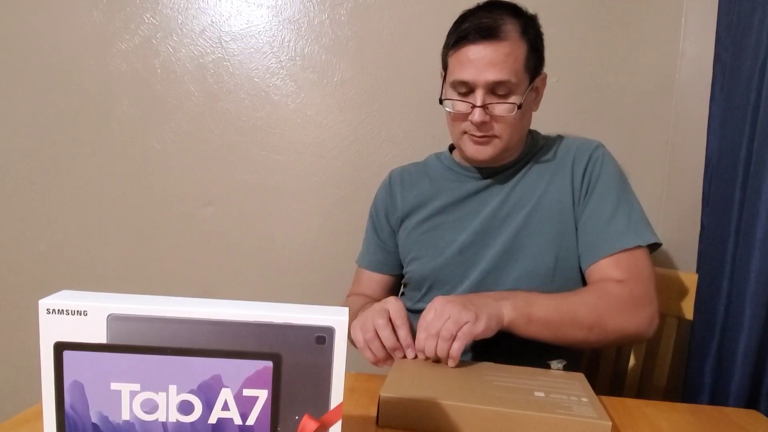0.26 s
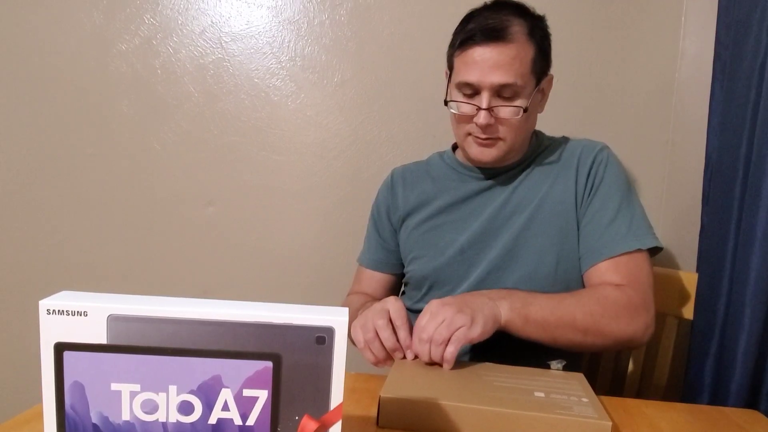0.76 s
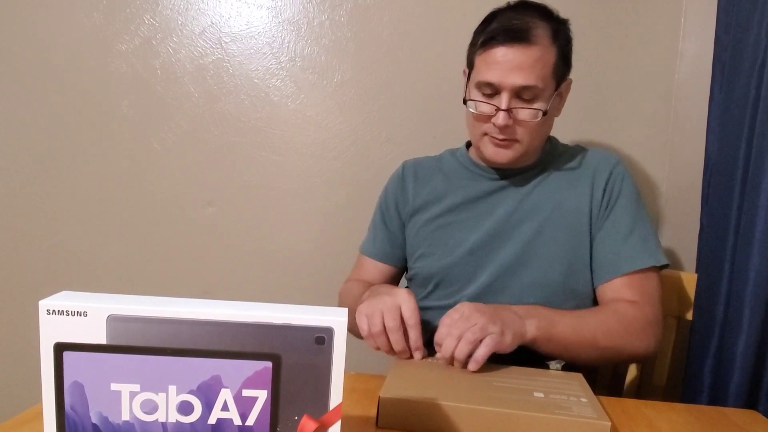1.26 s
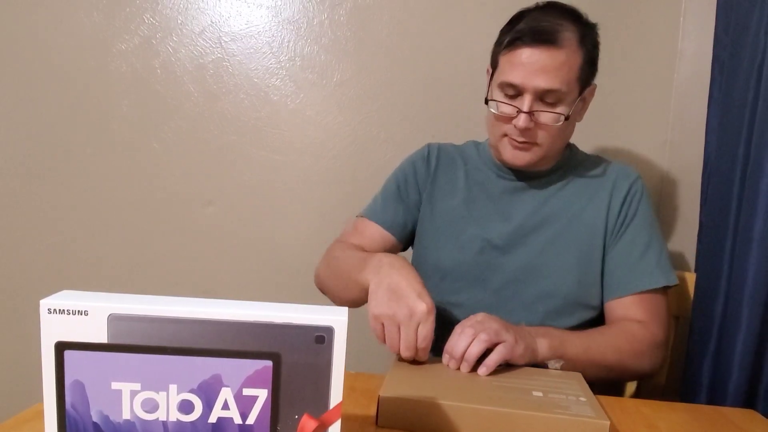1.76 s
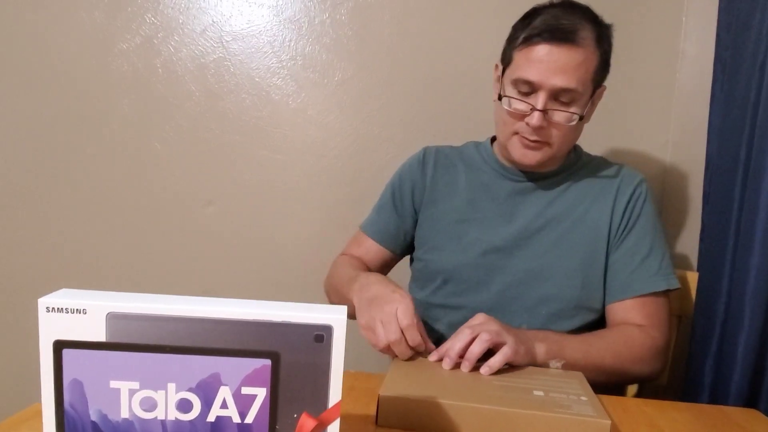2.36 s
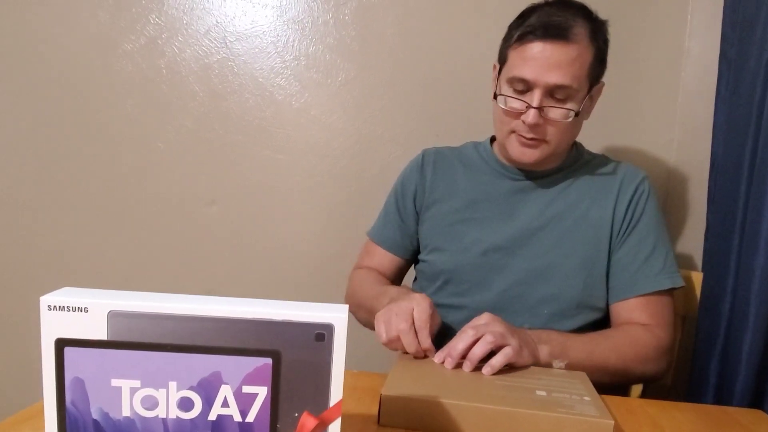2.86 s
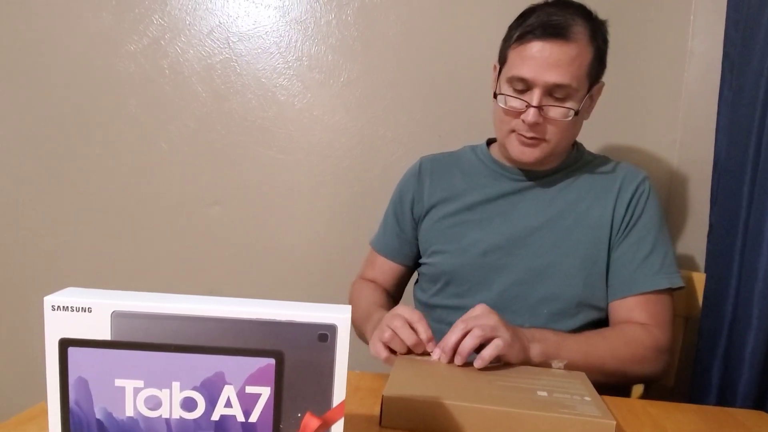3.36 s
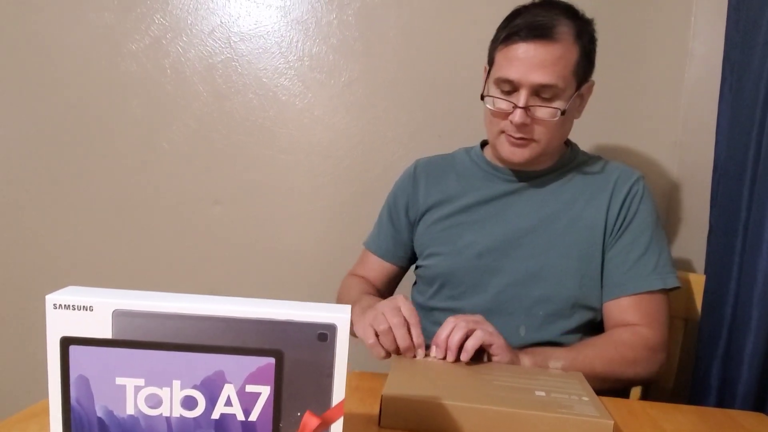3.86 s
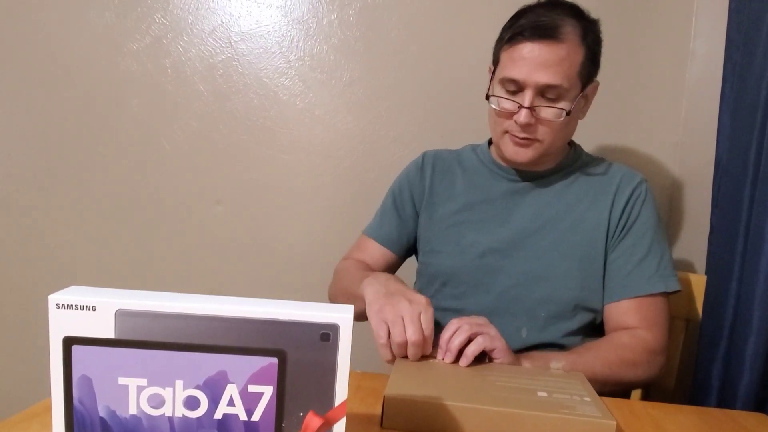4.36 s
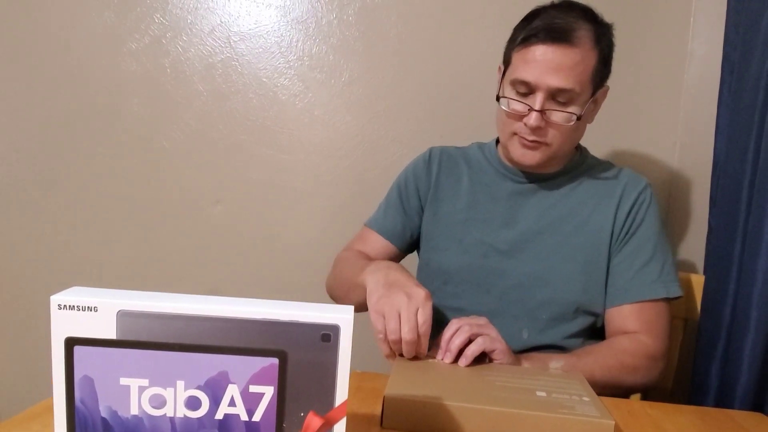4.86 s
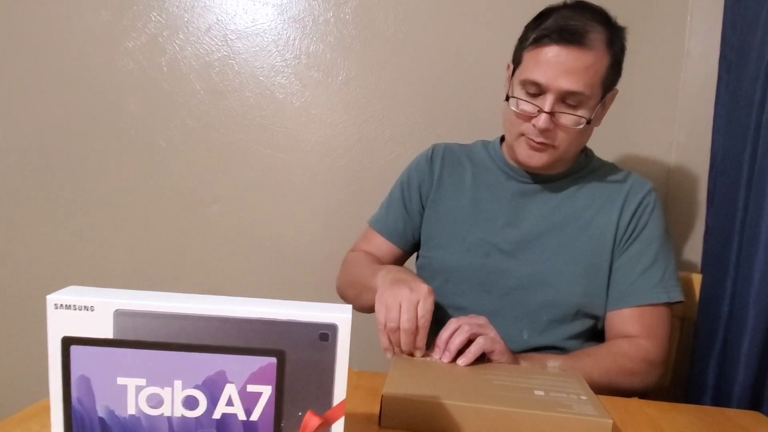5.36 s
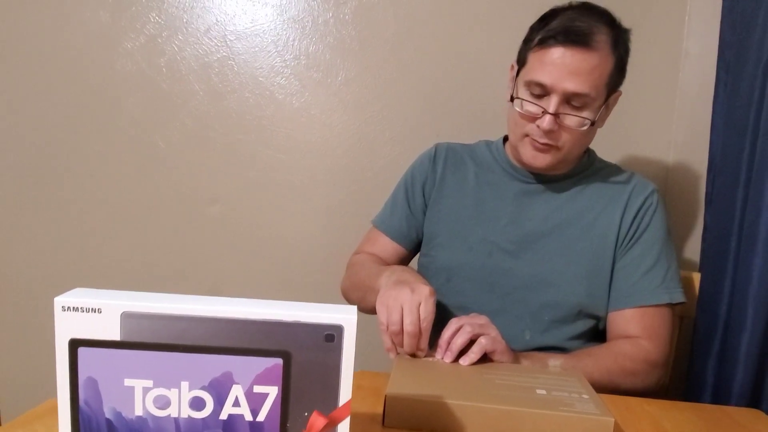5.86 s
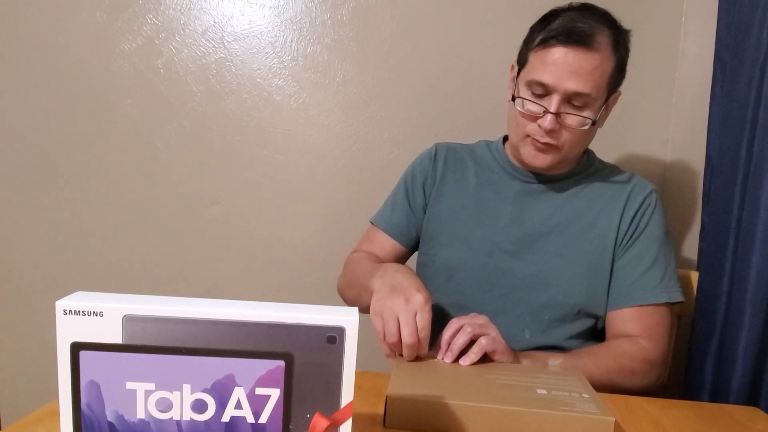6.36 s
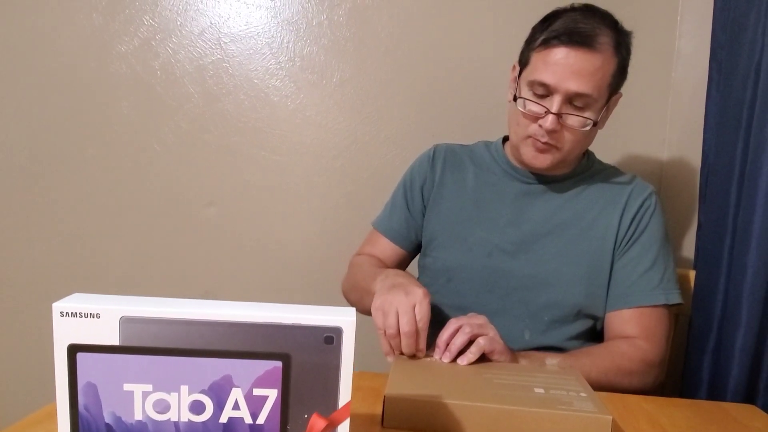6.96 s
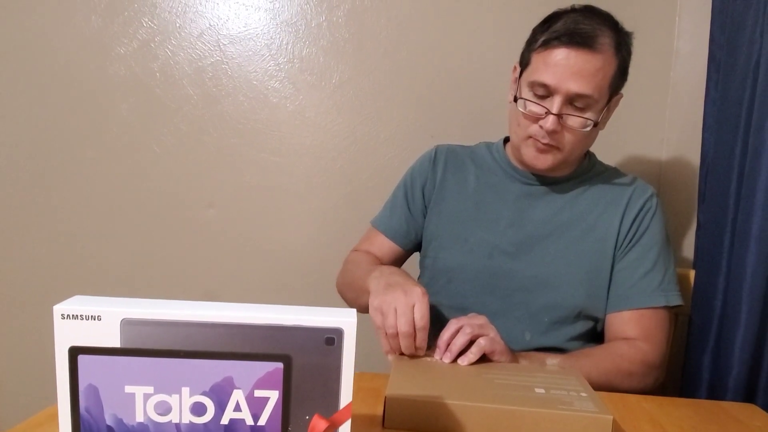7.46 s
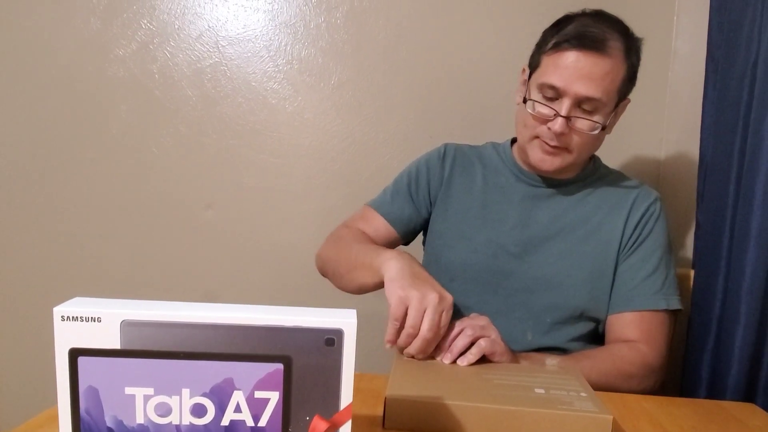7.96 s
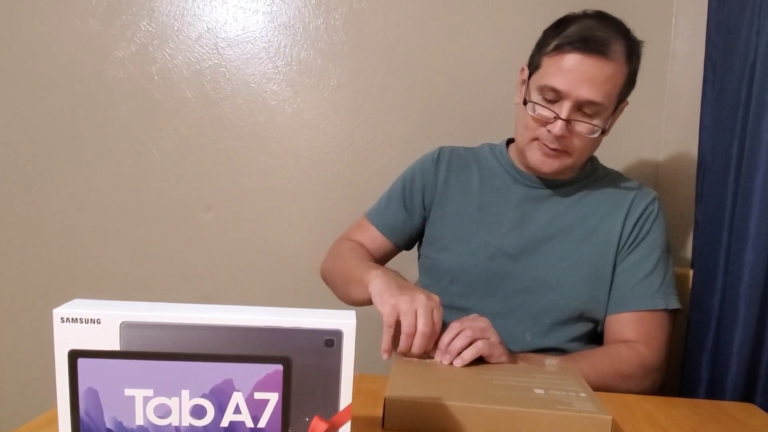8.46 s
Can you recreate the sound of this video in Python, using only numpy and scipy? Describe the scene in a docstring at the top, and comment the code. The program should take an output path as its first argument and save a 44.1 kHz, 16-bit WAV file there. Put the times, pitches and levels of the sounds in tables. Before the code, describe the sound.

A small quiet room with faint air and a low wavering hum, a microphone about a metre from a cardboard box on a table. A soft bump and skin rustle open, then quick nail knocks and scratches at 0.2-0.4 s. At 0.95 the box drops with a hollow thump and a sharp snap. Rubbing and light taps follow, with fine sizzling near 2.0 and a brief papery rip at 2.5. Tape peels in a jerky crackle from 2.8 to 3.2, with bright clicks until 3.7. Another thump comes at 4.3, a strong snap at 4.55 and nail scrapes until 5.2. Faint fidgeting taps grow from 5.7, a duller bump lands at 6.3, and scrapes follow around 6.6. Sparse touches and rustles lead to a second crackling pull from 8.1, ending near 8.47 in the loudest tight burst of snaps.

```python
"""A small, quiet room: fingers pick at the tape on a cardboard box that lies on a table, a phone about a metre away.
Fingertips knock the box (ringing modes) and nails scrape over its edge (stick-slip pulses that shake the board).
Tape peels with a fine crackle (trains of tiny releases) and lets go in sharp snaps (a spike with a brief flutter).
The room answers with a short echo of decaying noise, over still air and a low, wavering hum."""
import sys
import numpy as np
from scipy import signal
from scipy.fft import rfft, irfft, next_fast_len
from scipy.io import wavfile
from scipy.ndimage import uniform_filter1d

SR = 44100
rng = np.random.default_rng(int(sys.argv[2]) if len(sys.argv) > 2 else 0)


def dump(signal):
    """Clip the signal to [-1, 1] and save it as 16-bit WAV at the path in sys.argv[1]."""
    limited = np.clip(np.atleast_2d(signal).T, -1, 1)
    pcm = np.round(limited * 32767).astype(np.int16)
    wavfile.write(sys.argv[1], SR, pcm)


N = 384111
T = np.arange(N) / SR

# Grit shed at the edge, its spectrum. Each row: frequency in Hz, level in dB.
GRIT_SPECTRUM = [(300, 9), (1500, -7), (2300, 2), (3200, 5), (4500, 2.5), (6500, 4.5), (9000, -13.5),
                 (12000, -12.5), (15500, -7)]
# Board rasped by a nail or a tear, its spectrum. Each row: frequency in Hz, level in dB.
RASP_SPECTRUM = [(150, -21), (300, -14.5), (400, 1.5), (550, -8.5), (820, 4.5), (1150, 1), (1650, -3.5),
                 (2300, -9.5), (3200, -24.5), (8000, -27)]
# A nail catches the edge and scrapes over it.
# Each row: start in seconds, knock level in dB, scrape level in dB, scrape length in seconds.
NAIL_PICKS = [(0.2288, -32.5, -66, 0.011), (0.283, -29, -43, 0.053), (0.336, -39, -41.5, 0.021),
              (0.379, -40, -68, 0.0068), (4.6382, -33.5, -41.5, .018), (4.699, -42.5, -52.5, 0.024),
              (5.104, -37.5, -51, 0.068), (5.159, -42, -40, 0.083), (6.542, -45, -52.5, 0.075),
              (6.614, -35, -40, 0.084)]
# A finger slips off and the tilted box drops back. Each row: slip time in seconds, knock level in dB,
# centre of the modes reached in Hz, scrape level in dB, boom level in dB.
BOX_DROPS = [(0.001, -41.5, 710, -59, -37), (0.949, -27, 1010, -45.5, -26.5),
             (2.47, -33.5, 1250, -59.5, -42.5), (4.3247, -26.5, 800, -47, -29),
             (6.3275, -27, 402, -61.5, -50)]
# Two long pulls on the tape, a curve each.
# Each row of a curve: time in seconds, peeling level in dB, skin rustle level in dB.
TAPE_PULLS = [
    [(2.78, -85, -77), (2.83, -70, -61), (2.9, -59, -59), (2.96, -58.5, -68.5), (3.07, -48.5, -55),
     (3.13, -55, -57.5), (3.18, -52.5, -64), (3.24, -75, -89)],
    [(8.06, -87, -69), (8.13, -76, -70), (8.19, -60, -62), (8.28, -67.5, -74.5), (8.34, -56, -63),
     (8.42, -47.8, -71), (8.46, -51.5, -56)],
]

PICK_HZ = 860  # centre of the modes that a nail reaches
FALL_S = 0.00518  # from the slip of a finger to the landing of the box
SWIPE_RISE_SHARE = 0.25  # share of a swipe or a press spent building up


def undb(db):
    """Decibels to gain."""
    return np.exp(np.asarray(db) * (np.log(10) / 20))


def unit(x):
    """Scale to rms 1."""
    return x / np.sqrt(np.mean(x ** 2))


def along(points, hz):
    """Read (Hz, value) points on a log-frequency axis."""
    f, value = np.transpose(points)
    return np.interp(np.log(np.maximum(hz, 1)), np.log(f), value)


def colour(points, size=1024):
    """Causal (minimum-phase) impulse response with the given spectrum, by folding its cepstrum."""
    spectrum_db = along(points, np.fft.rfftfreq(size, 1 / SR))
    cepstrum = irfft(np.log(undb(spectrum_db)))
    cepstrum[1:size // 2] *= 2
    cepstrum[size // 2 + 1:] = 0
    return irfft(np.exp(rfft(cepstrum)))


def through(x, response):
    """Pass a sound through a response; channels x samples."""
    wet = signal.oaconvolve(np.atleast_2d(x), np.atleast_2d(response), axes=1)
    return wet[:, :np.shape(x)[-1]]


def add(out, s, x):
    """Mix a sound in at a time in seconds."""
    i = max(int(s * SR), 0)
    out[..., i:i + x.shape[-1]] += x[..., :N - i]


def walk(rate):
    """Smooth chance with spread near 1, a new random target `rate` times a second."""
    return np.interp(T * rate, np.arange(N // 10), rng.standard_normal(N // 10)) * np.sqrt(3 / 2)


def diffuse(size, alike_hz):
    """Noise at two microphone ports: nearly the same in the bass, unrelated in the treble."""
    length = next_fast_len(size, True)
    mid, side = rfft(rng.standard_normal((2, length)))
    alike = .97 / (1 + (np.fft.rfftfreq(length, 1 / SR) / alike_hz) ** 4)
    opposite = np.array([[1], [-1]])
    both = mid * np.sqrt(1 + alike) + side * np.sqrt(1 - alike) * opposite
    return irfft(both, length)[:, :size] / np.sqrt(2)


def slips(rate, spread_db):
    """Irregular tiny releases of unequal size, `rate` a second on average, rms 1."""
    size = undb(spread_db * np.minimum(rng.exponential(size=N), 4))
    return unit((rng.random(N) < rate / SR) * size * rng.choice([-1, 1], N))


def crackle(pulses, points, flutter_s, alike_hz):
    """Every release starts its own short flutter of fibres, in the given colour."""
    decay = np.exp(-2 / (flutter_s * SR))
    energy = signal.lfilter([1 - decay], [1, -decay], pulses ** 2 + 1e-18)
    tone = colour(points)
    return through(np.sqrt(energy) * diffuse(len(pulses), alike_hz), tone / np.linalg.norm(tone))


def ring(modes, length_s, scatter_db, apart_hz):
    """Modes struck at a chance spot, neighbours in opposite sense; the higher ones reach the ports out of step."""
    hz, db, t60 = np.transpose(modes)[:, :, None]
    t = T[:int(length_s * SR)]
    size, detune, lag = rng.standard_normal((3, len(modes), 1))
    sense = (-1) ** np.arange(len(modes))[:, None]
    fade = sense * undb(db + scatter_db * size - 60 * t / t60)
    phase = 2 * np.pi * hz * (1 + .025 * detune) * t
    return np.array([np.sum(fade * np.sin(phase + side * lag * hz / apart_hz), axis=0) for side in (-1, 1)])


def splinter(ring_s, ring_db):
    """A spike together with the dense, brief flutter of tape and paper."""
    t = T[:SR // 6]
    flutter = rng.standard_normal((2, len(t))) * np.exp(-t / ring_s)
    return (t == 0) + undb(ring_db) * flutter / np.sqrt(np.sum(flutter ** 2) / 2)


def strokes(rows):
    """Finger strokes (s, rise s, fade s, dB, ..): pressure builds and lets go; one gain curve per dB column."""
    out = np.zeros((len(rows[0]) - 3, N))
    for s, rise, fade, *levels in rows:
        shape = np.interp(T[:SR // 2], [0, abs(rise), abs(rise) + abs(fade)], [0, 1, 0])
        add(out, s, undb(levels)[:, None] * shape)
    return out


def swells(rows, rise_share):
    """Gain curves for strokes (s, length s, dB, ..) that all build up for the same share of their length."""
    return strokes([(s, rise_share * length, (1 - rise_share) * length, *levels) for s, length, *levels in rows])


def hardness(centre_hz):
    """How much more a contact ticks and sheds grit than a picking nail does, in dB; soft pads hardly do."""
    return 7.5 * np.log2(centre_hz / PICK_HZ)  # dB per octave


def background(air_db=-68, hum_hz=34, hum_db=-61):
    """Still air in the house as coloured noise, and the wavering drone of a distant appliance."""
    # Spectrum of the still air. Each row: frequency in Hz, level in dB.
    air_spectrum = [(20, -45.5), (55, -2.5), (100, -4.5), (200, -14.5), (370, -18.5), (600, -28),
                    (1200, -34.5), (2500, -36.5), (4500, -42), (6200, -37.5), (8500, -45), (15500, -40.5)]
    air = unit(through(diffuse(N, alike_hz=600), colour(air_spectrum))) * undb(.5 * walk(4))
    pitch_hz = hum_hz + 1.6 * walk(8)
    drone = np.sin(2 * np.pi * np.cumsum(pitch_hz) / SR) * undb(1.2 * walk(7))
    return undb(air_db) * air + undb(hum_db) * unit(drone)


def room(x, wet_db=-5, build_s=0.00067):
    """Near walls answer within a few ms; each band of the noise tail dies at its own pace, the top fastest."""
    # Spectrum of the echo. Each row: frequency in Hz, level in dB.
    echo_spectrum = [(60, 13.5), (200, 4), (600, -1.5), (2500, 6), (6000, -4), (10000, 1.5), (16000, -4.5)]
    # Decay of the echo. Each row: band centre in Hz, time to fall by 60 dB in seconds.
    echo_decay = [(100, 0.38), (500, 0.52), (2000, 0.33), (6000, 0.4), (16000, 0.24)]
    size = SR // 2
    t, noise = T[:size], rfft(diffuse(size, alike_hz=980))
    hz, tail = np.fft.rfftfreq(size, 1 / SR), 0
    tone = undb(along(echo_spectrum, hz))
    for centre, t60 in echo_decay:
        band = along([(f, f == centre) for f, _ in echo_decay], hz)
        fade = undb(-60 * t / t60) / np.sqrt(t60 * SR / np.log(1e6))
        tail = tail + irfft(noise * band * tone, size) * fade
    return undb(wet_db) * through(x, tail * (1 - np.exp(-(t / build_s) ** 2)))


def bumps():
    """The box drops back, rebounds once and sets the table top booming, all modes pushed the same way."""
    # Modes of box and table together. Each row: frequency in Hz, level in dB, time to fall by 60 dB in seconds.
    table_modes = [(69, -7, 0.35), (88.8, 2, 0.11), (108, -1, 0.22), (148.7, 4.5, 0.084),
                   (166.3, -6.5, 0.16), (215, -19, 0.043)]
    out = np.zeros((2, N))
    for s, *_, db in BOX_DROPS:
        for late_s, weaker_db in ((0, 0), (.051, -15)):  # landing, rebound
            boom = sum(ring([mode], length_s=.3, scatter_db=1, apart_hz=1000) for mode in table_modes)
            add(out, s + FALL_S + late_s, boom * undb(db + weaker_db) / np.abs(boom).max())
    # the table top radiates little below this
    return signal.sosfilt(signal.butter(2, 71.6, "high", fs=SR, output="sos"), out)


def contacts(thud_hz=313, thud_db=-5.5, fidget_gap_s=0.099, fidget_hz=335):
    """Every knock on the box, from picks, taps, drops and fidgeting: (s, dB, centre Hz of the modes reached)."""
    # Knocks on the box: fingertips land on it, except the row at 8.4816 s, where the hard snap knocks it. Each
    # row: time in seconds, level in dB, centre of the modes reached in Hz.
    box_taps = [(1.585, -45.5, 710), (1.849, -42.5, 666), (2.308, -50.5, 477), (2.366, -43.5, 940),
                (2.666, -39.5, 880), (2.811, -43.5, 412), (4.103, -42.5, 700), (4.825, -41, 640),
                (4.916, -38.5, 372), (6.249, -47, 388), (7.18, -54, 417), (7.212, -47.5, 520),
                (7.586, -49.5, 760), (7.756, -45.5, 670), (8.4816, -35, 940), (8.538, -37, 990)]
    # Fingers feel for a grip with light, irregular taps that grow firmer. Each row: time in seconds, level in dB.
    fidget_firmness = [(5.72, -62.5), (6.241, -51)]
    rows = [(s, db, PICK_HZ) for s, db, _, _ in NAIL_PICKS] + list(box_taps)
    for s, db, centre_hz, _, boom_db in BOX_DROPS:
        rows.append((s, db, centre_hz))
        rows.append((s + FALL_S, boom_db + thud_db, thud_hz))  # the bottom panel on landing, against the boom
    span, firmness = np.transpose(fidget_firmness)
    times = span[0] + fidget_gap_s * np.cumsum(.5 + rng.random(20))
    return rows + [(s, np.interp(s, span, firmness), fidget_hz) for s in times[times < span[-1]]]


def knocks(blows, reach_octaves=0.78, gain_db=1, softness=3.2):
    """Soft pads reach the low panel modes, hard nails the higher flap modes."""
    # Panels and flap of the box. Each row: frequency in Hz, level in dB, time to fall by 60 dB in seconds.
    box_modes = [(206, -4.5, 0.077), (310, 0, 0.046), (373.7, 5, 0.026), (455.7, -5.5, 0.074),
                 (581, -6.5, 0.035), (724.6, -1, 0.056), (851, 1.5, 0.034), (976, -6.5, 0.029),
                 (1130, 0, 0.027), (1335, -4, 0.068), (1575, -6.5, 0.067), (2050, -4, 0.051),
                 (2310, -11.5, 0.17), (2590, -20.5, 0.016)]
    out = np.zeros((2, N))
    for s, db, centre_hz in blows:
        modes = []
        for hz, level, t60 in box_modes:
            octaves = np.log2(hz / centre_hz)
            modes.append((hz, level - 20 * np.log10(1 + (octaves / reach_octaves) ** 2), t60))
        blow = ring(modes, length_s=.08, scatter_db=-0.5, apart_hz=2980)
        blow = signal.sosfilt(signal.butter(2, softness * centre_hz, fs=SR, output="sos"), blow)
        add(out, s, blow * undb(db + gain_db) / np.abs(blow).max())
    return out


def swiping(ease_s=0.047):
    """Gain curves of the swipes, eased in and out: rustle, crackle and sizzle."""
    # A fingertip swipes over board and tape. Each row: start in seconds, length in seconds,
    # skin rustle level in dB, tape crackle level in dB, fine sizzle level in dB.
    fingertip_swipes = [(0, 0.16, -55.5, -80, -87), (.63, 0.53, -76.5, -101, -85),
                        (1.09, 0.1, -51, -62.5, -70), (1.245, 0.14, -51.5, -58, -65),
                        (1.47, 0.09, -65, -66, -85), (1.555, 0.086, -63.5, -66.5, -82),
                        (1.66, 0.21, -59, -70, -69.5), (1.78, 0.34, -79, -72, -71),
                        (1.99, 0.079, -54.5, -53, -48), (2.09, 0.23, -66.5, -59, -60.5),
                        (2.62, 0.27, -58.5, -71, -74), (3.23, 0.17, -58, -59, -59),
                        (3.38, 0.12, -61, -67.5, -62), (3.52, 0.2, -66.5, -69, -63),
                        (3.7, 0.16, -57.5, -78, -70), (3.86, 0.18, -65, -71.5, -74),
                        (4.015, 0.1, -58, -69, -78), (7.45, 0.13, -75.5, -78, -77),
                        (7.72, 0.099, -67, -78, -92)]
    return uniform_filter1d(swells(fingertip_swipes, SWIPE_RISE_SHARE), max(int(ease_s * SR), 1))


def pulling(release_s=0.021, jerks_per_s=42, jerk_db=2.5):
    """Gain curves of the long pulls, peeling and rustle; they jerk because the glue gives way unevenly."""
    out = np.zeros((2, N))
    for curve in TAPE_PULLS:
        s, *levels = np.transpose(curve)
        held = np.interp(T, [s[0] - release_s, s[0], s[-1], s[-1] + release_s], [0, 1, 1, 0])
        out += held * undb([np.interp(T, s, db) for db in levels])
    return out * undb(jerk_db * walk(jerks_per_s))


def rubbing(rustle, swipe_judder_db=-7):
    """Skin drags in fits over the board: the lid judders and its surface rustles."""
    # The holding hand shifts its weight and the lid judders.
    # Each row: start in seconds, length in seconds, level in dB.
    hand_presses = [(0, 0.069, -55.5), (1.08, 0.22, -68.5), (2.77, 0.24, -64.5), (3.54, 0.31, -54.5),
                    (7, 0.14, -61), (7.18, 0.095, -58)]
    # Spectrum of the juddering lid. Each row: frequency in Hz, level in dB.
    judder_spectrum = [(60, -14.5), (150, -10.5), (260, -8.5), (370, -1.5), (500, -9.5), (800, -15.5),
                       (2000, -33), (6000, -55)]
    # Spectrum of the rustling surface. Each row: frequency in Hz, level in dB.
    rub_spectrum = [(200, -22), (550, -5.5), (780, 3.5), (1050, -2), (1300, -1), (1680, -4), (2100, -15),
                    (4000, -17), (12000, -36)]
    judder = rustle * undb(swipe_judder_db) + swells(hand_presses, SWIPE_RISE_SHARE)[0]
    lid_slips = slips(rate=300, spread_db=0.0) * judder
    lid = crackle(lid_slips, judder_spectrum, flutter_s=0.0032, alike_hz=1250)
    skin_slips = slips(rate=410, spread_db=0.5) * rustle
    return lid + crackle(skin_slips, rub_spectrum, flutter_s=0.0051, alike_hz=1290)


def scrapes(body_db=1, grit_gain_db=4):
    """Stick-slip pulses shake the board, its resonances blurred as the nail travels; each slip sheds a little grit."""
    pulses = slips(rate=900, spread_db=3)
    # a stronger scrape sheds more grit, by 0.34 dB per dB
    pick_rows = [(s, length, db, -41.5 + 0.34 * db) for s, _, db, length in NAIL_PICKS]
    # the nail's scrape as it slips off: rise and fade in seconds, scrape dB, grit dB
    slip_rows = [(s, 0.0047, 0.08, db, db - 5.5 + hardness(hz)) for s, _, hz, db, _ in BOX_DROPS]
    force, grit = swells(pick_rows, rise_share=0.16) + strokes(slip_rows)
    body = crackle(pulses * force * undb(body_db), RASP_SPECTRUM, flutter_s=0.0025, alike_hz=1720)
    return body + crackle(pulses * grit * undb(grit_gain_db), GRIT_SPECTRUM, flutter_s=0.0051, alike_hz=1520)


def tear(s=2.478, rise_s=0.043, fade_s=0.025, db=-35.5, rasp_db=-43, grit_db=-41):
    """A strip of the top paper rips off: a short, dense crunch that shakes the board and sheds grit."""
    # Spectrum of the ripping paper. Each row: frequency in Hz, level in dB.
    tear_spectrum = [(400, -9), (900, 12), (1250, 1.5), (1650, 6.5), (2100, 1.5), (2700, -2.5), (4000, -13),
                     (7000, -8), (15000, -31)]
    fibres = slips(rate=1400, spread_db=3) * strokes([(s, rise_s, fade_s, 0)])[0]
    layers = ((db, tear_spectrum), (rasp_db, RASP_SPECTRUM), (grit_db, GRIT_SPECTRUM))
    out, span = np.zeros((2, N)), fibres[int(s * SR):][:SR // 4]
    for level_db, tone in layers:
        add(out, s, crackle(span * undb(level_db), tone, flutter_s=.0015, alike_hz=1500))
    return out


def peeling(coarse, fine):
    """Glue threads break one by one under the tape, in little runs; the thinnest ones sizzle."""
    # Spectrum of the peeling crackle. Each row: frequency in Hz, level in dB.
    peel_spectrum = [(300, -28), (1500, -16.5), (2600, -15.5), (4200, -3), (6000, 3.5), (8500, -4.5),
                     (11000, -10.5), (15500, -33)]
    # Spectrum of the thinnest threads. Each row: frequency in Hz, level in dB.
    sizzle_spectrum = [(3000, -38.5), (8000, -19), (11000, -1.5), (15500, 1)]
    threads = slips(rate=1700, spread_db=4.4) * unit(undb(1.8 * walk(50)))
    layers = ((coarse, peel_spectrum), (fine, sizzle_spectrum))
    return sum(crackle(threads * pull, tone, flutter_s=.0008, alike_hz=2000) for pull, tone in layers)


def small_snaps(blows, tick_db=-9.5, tick_above_db=-54, tick_lag_s=0.0014, tick_low_hz=2400,
                threads_per_s=13, thread_db=15, thread_spread_db=3, thread_low_hz=4800):
    """Ticks of firm contacts, and thicker threads that snap at random as hard as the tape is pulled: (s, dB, low Hz)."""
    rows = []
    for s, db, hz in blows:
        firm_db = db + hardness(hz)  # harder contacts tick more
        if firm_db > tick_above_db:
            rows.append((s + tick_lag_s, firm_db + tick_db, tick_low_hz))
    for curve in TAPE_PULLS:
        s, db, _ = np.transpose(curve)
        times = s[0] + np.cumsum(2 * rng.random(20)) / threads_per_s
        levels = np.interp(times, s, db) + thread_db + thread_spread_db * rng.standard_normal(20)
        rows += [(at, level, thread_low_hz) for at, level in zip(times, levels) if at < s[-1]]
    return rows


def snaps(releases, flap_db=-42, board_db=-15, flap_growth=0.29, give_db=-5):
    """Sudden releases; the smaller the freed piece, the less bass it radiates, but the board passes on a little."""
    # Spectrum of a snap. Each row: frequency in Hz, level in dB.
    snap_spectrum = [(300, -2), (1500, 7.5), (2500, -3.5), (3300, 0.5), (4700, 2), (6300, 4), (8500, -4),
                     (11000, -6), (15500, -6.5)]
    # The freed flap rings on. Each row: frequency in Hz, level in dB, time to fall by 60 dB in seconds.
    flap_modes = [(1980, 3.5, 0.051), (2236, 7.5, 0.11), (2500, 11, 0.066), (2740, 13, 0.072),
                  (3280, -21, 0.031), (4240, 7, 0.062)]
    out, tone = np.zeros((2, N)), colour(snap_spectrum)
    lead, board = SR // 300, signal.butter(2, 1500, fs=SR, output="sos")
    for s, db, low_hz in releases:
        # fibres start to give a moment before they let go
        give = rng.standard_normal((2, lead)) * np.exp(-T[:lead][::-1] / .0008)
        give = undb(give_db) * give / np.linalg.norm(give[0])
        crack = through(np.hstack([give, splinter(ring_s=.0014, ring_db=0)]), tone)
        # the harder the snap, the more the flap rings
        flap = ring(flap_modes, length_s=1 / 6, scatter_db=1, apart_hz=4000)
        crack[:, lead:] += undb(flap_db + flap_growth * db) * flap
        bass = signal.sosfilt(board, crack)
        piece = signal.butter(2, min(low_hz, SR / 3), "high", fs=SR, output="sos")
        crack = signal.sosfilt(piece, crack) + undb(board_db) * bass
        # level set by the energy of the whole snap
        add(out, s - lead / SR, crack * undb(db) * 2 / np.sqrt(np.sum(crack ** 2) / 2))
    return out


def scene():
    """The box and the hands in their room."""
    # Tape and fibres snap. Each row: time in seconds, level in dB, lowest strong frequency in Hz.
    tape_snaps = [(0.9525, -16, 3600), (2.309, -36, 3600), (2.3676, -31, 1960), (2.9618, -30, 7000),
                  (3.163, -21, 4830), (3.3267, -35, 5860), (3.602, -35.5, 10000), (3.675, -17, 7340),
                  (4.327, -29, 7000), (4.5549, -12.5, 9150), (4.6139, -27.5, 4350), (5.108, -31.5, 9000),
                  (8.182, -38.5, 4000), (8.3163, -32.5, 9100), (8.3391, -36, 5130), (8.401, -17.5, 4800),
                  (8.4692, -9, 3380), (8.4829, -4.5, 3000), (8.4843, -10, 1980)]
    blows = contacts()
    rustle, coarse, fine = swiping()
    peel, drag = pulling()
    skin = rubbing(rustle + drag * undb(0.5))
    tape = peeling(coarse + peel * undb(1.5), fine + peel * undb(3))
    box = knocks(blows) + bumps() + scrapes() + tear()
    direct = box + skin + tape + snaps(list(tape_snaps) + small_snaps(blows))
    return background() + room(direct) + direct


def record(dry):
    """Each microphone port of the phone has its own colour; a steep low-pass cuts the top."""
    # How the two ports differ. Each row: frequency in Hz, left minus right in dB.
    port_difference = [(100, 2), (400, 1.5), (850, 0), (1300, 3), (2400, 0.5), (4400, -1.5), (8000, -1.5),
                       (11000, 3), (14500, 11)]
    ports = np.array([colour([(hz, side * db / 2) for hz, db in port_difference]) for side in (1, -1)])
    top_cut = signal.ellip(10, .2, 80, 16100, fs=SR, output="sos")
    return signal.sosfilt(top_cut, through(dry, ports))


dry = scene()
out = record(dry)
dump(out)
```